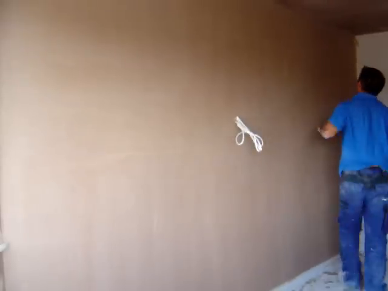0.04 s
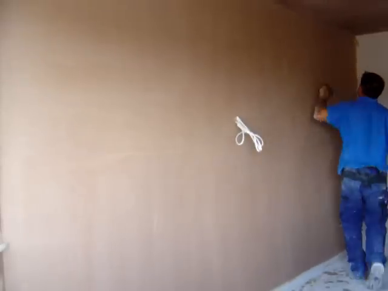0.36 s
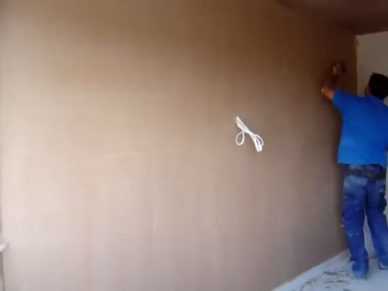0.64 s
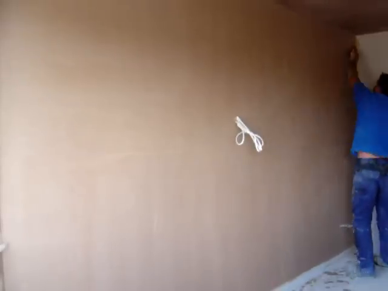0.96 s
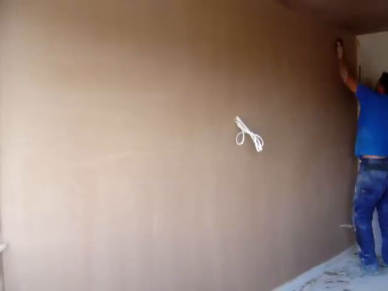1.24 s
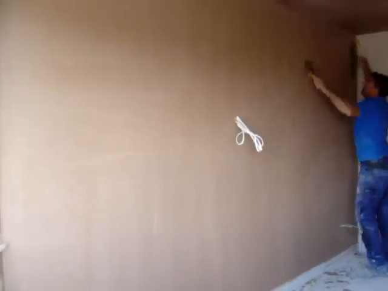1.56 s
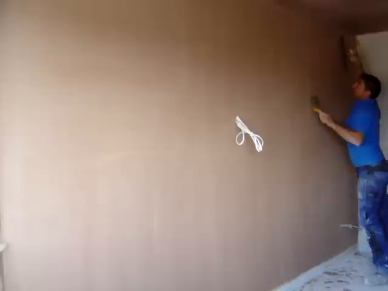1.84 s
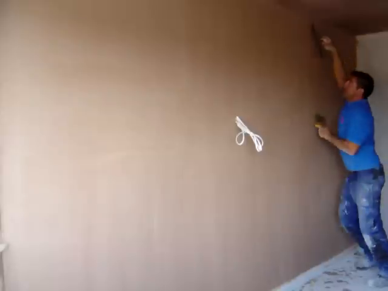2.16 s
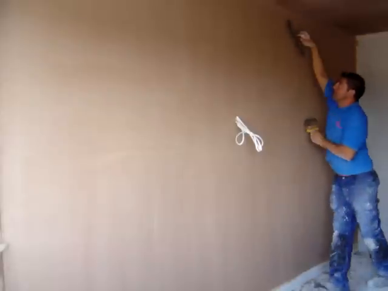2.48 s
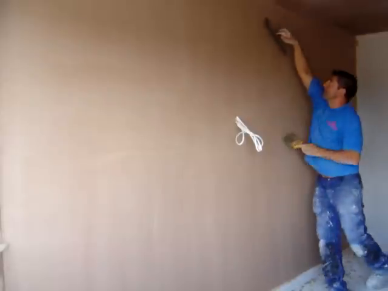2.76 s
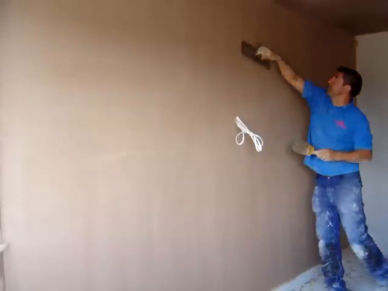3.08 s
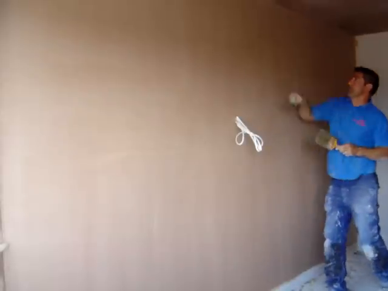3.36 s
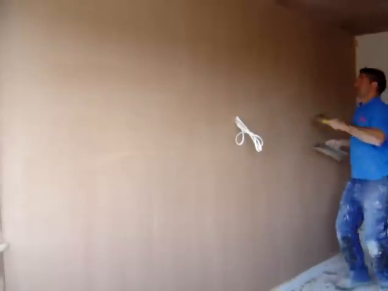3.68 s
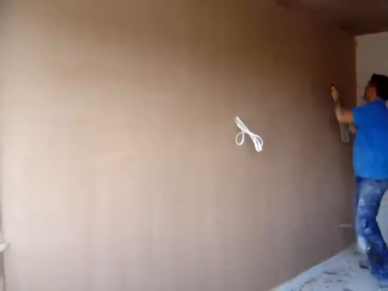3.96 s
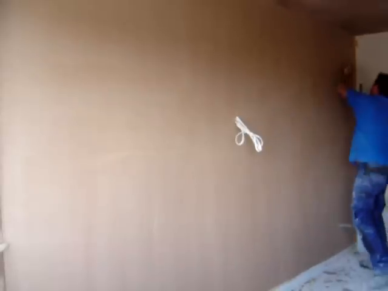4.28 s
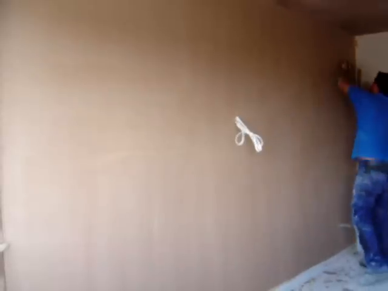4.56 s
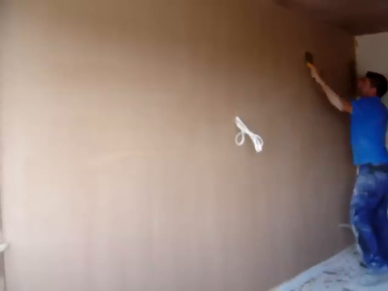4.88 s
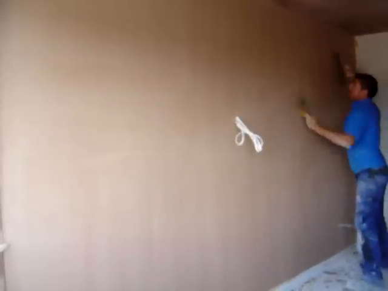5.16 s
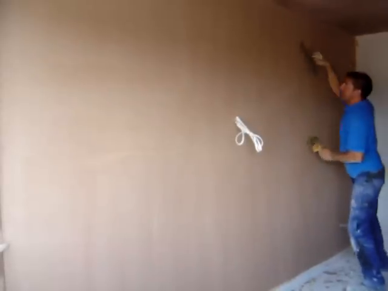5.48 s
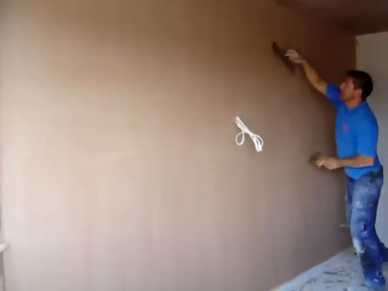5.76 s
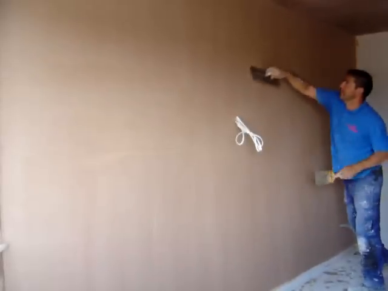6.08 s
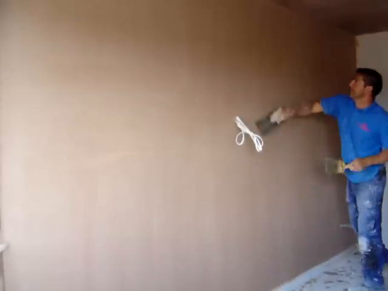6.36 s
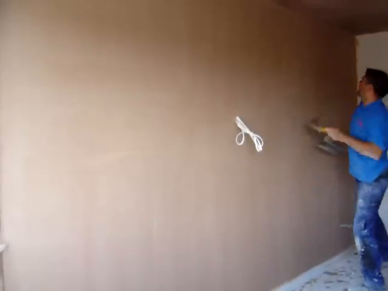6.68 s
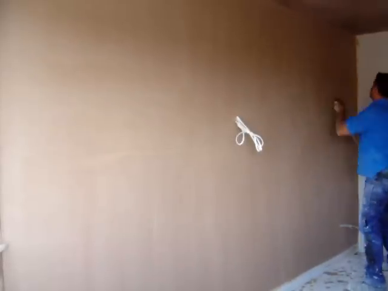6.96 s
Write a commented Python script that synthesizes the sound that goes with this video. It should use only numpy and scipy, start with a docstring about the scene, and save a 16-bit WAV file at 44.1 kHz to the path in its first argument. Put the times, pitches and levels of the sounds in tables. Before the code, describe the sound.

In a bare, echoing room a wet brush slaps a wall and a footstep thuds. A steel trowel catches in the corner, snaps free with a clang and sweeps over wet plaster in a long gritty scrape, then a softer one. Tools tick, the brush swishes, and the judder, clang and scrapes come again. A small microphone inside the room also picks up low steps and a faint hush of air.

```python
"""A steel trowel works wet plaster in a bare room, heard from a small microphone standing inside.
Twice the blade judders into the corner, snaps free with a clang and sweeps on in a long gritty scrape
as sand slips under its edge. In the plasterer's other hand a water brush slaps and swishes.
Behind the work, tools tick and his steps thud on the floor over a faint hush of air.
The hard walls ring for about half a second."""
import sys
import numpy as np
from scipy import signal
from scipy.fft import rfft, irfft
from scipy.io import wavfile
from scipy.ndimage import uniform_filter1d

SR = 44100
rng = np.random.default_rng(int(sys.argv[2]) if len(sys.argv) > 2 else 0)


def output_pcm(signal):
    """Save a mono or channel-first signal as 16-bit PCM at the path in sys.argv[1].

    Samples are clipped to [-1, 1] before scaling.
    """
    pcm = np.clip(np.atleast_2d(signal).T, -1, 1) * 32767
    wavfile.write(sys.argv[1], SR, np.round(pcm).astype(np.int16))


N = 318843
T = np.arange(N) / SR

# Levels in the tables are relative; each source sets its own gain.
# reverberation of the bare room: f/Hz, t60/s
ROOM_DECAY = [(100, 0.55), (500, 0.62), (1400, 0.6), (4000, 0.56), (9000, 0.48)]
# still air around the microphone: f/Hz, level/dB
AIR_SPECTRUM = [(30, -16), (100, -6), (250, 2.5), (550, 3.5), (1200, 1.5), (2500, -5.5), (5000, -7),
                (10000, -13)]

# boom of floor and room: f/Hz, width/Hz, level/dB
FLOOR_MODES = [(106.4, 4.8, 1.5), (132.3, 8.6, 7), (151.6, 70, 9), (179.6, 8, 5), (237.6, 13, -15.5)]
# knock of a heel: f/Hz, level/dB
HEEL_SPECTRUM = [(60, -9.5), (130, -4), (240, -0.5), (340, -3), (480, -15), (900, -22), (3000, -35)]
# steps on the floor, plus a low thump at 1.48 s: t/s, level/dB, knock offset/dB
THUMPS = [(0.136, -22, -21), (0.319, -38, 5.5), (0.38, -43, 4), (0.742, -10.5, -40), (1.482, -37, -5.5),
          (1.881, -35, -29), (2.008, -37.5, 6.5), (2.179, -29.5, -24), (2.538, -27.5, -10.5),
          (2.718, -30.5, -14), (3.015, -29, 4), (3.473, -36.5, 4.5), (4.009, -13, -18), (4.28, -29, 2),
          (5.252, -27.5, -1.5), (5.447, -26, -33), (5.699, -26.5, -10), (6.83, -8.5, -24),
          (7.043, -27.5, -23)]

# small taps of the tools: t/s, tick/dB, clink/dB
TOOL_TAPS = [(2.541, -31, -27), (3.364, -29, -64), (3.669, -40, -31), (3.794, -57, -39), (3.906, -44, -36),
             (6.584, -35.5, -42)]
# light clink of steel: f/Hz, width/Hz, level/dB
CLINK_MODES = [(1367, 16, -6), (2000, 99, -1.5), (3010, 40, -11), (4560, 60, -10)]

# the brush's soft body, its bristle tips and its wet swish: f/Hz, level/dB
BODY_SPECTRUM = [(90, -10), (230, -7), (350, -2), (440, -8.5), (540, 2), (750, -3.5), (1000, -8),
                 (1250, -6), (1500, -9), (2100, -9), (4000, -17), (9000, -52.5)]
TIPS_SPECTRUM = [(500, -27), (2000, -3.5), (2900, -4), (4000, -2), (5500, -2), (8000, -3), (10000, -8)]
SWISH_SPECTRUM = [(200, -28), (900, -6), (1600, -3.5), (2050, 0), (2600, -1.5), (3300, -4.5), (4500, -5.5),
                  (6500, -10), (10000, -18)]
# light passes of the brush: t/s, length/s, body/dB, tips/dB
BRUSH_PASSES = [(0, 0.042, -46.5, -47), (0.416, 0.049, -39.5, -51.5), (1.126, 0.074, -40, -54),
                (1.256, 0.53, -54, -38.5), (3.84, 0.19, -42.5, -61), (4.305, 0.26, -34, -42.5),
                (6.927, 0.27, -47, -51.5)]
# slaps and quick strokes of the brush: t/s, length/s, level/dB, body offset/dB
BRUSH_SLAPS = [(0.126, 0.091, -25.5, -14), (0.374, 0.015, -45, 12.5), (0.747, 0.016, -20, 4),
               (2.541, 0.042, -32, -3), (3.02, .021, -38.5, 5.5), (3.617, 0.057, -41.5, 0.5),
               (4.003, 0.015, -38, 6), (4.271, 0.017, -36, 4.5), (5.399, 0.032, -33, 0.5),
               (5.68, 0.036, -36, 6), (7.14, .03, -46, 3.5)]

# the blade's lower and upper bending modes, and its higher ring: f/Hz, width/Hz, level/dB
LOWER_MODES = [(601, 33, -11.5), (751, 36, -2), (852.4, 55, 2.5), (1020, 24, -5.5), (1097, 45, -15)]
UPPER_MODES = [(1143, 95, 3.5), (1251, 45, 8.5), (1317, 70, -5.5), (1380, 110, -13)]
RING_MODES = [(1288, 8, 6.5), (1400, 28, 7.5), (1754, 140, 3), (2660, 370, -14), (3350, 34, -11),
              (4220, 290, 0)]
# sand under the edge, and the wall under the juddering blade: f/Hz, level/dB
GRIT_SPECTRUM = [(100, -19), (400, -8), (1000, 0), (1550, -6.5), (2000, -3.5), (2650, 0.5), (3300, -3.5),
                 (4600, -9), (5800, -9), (8000, -14), (10000, -17)]
WALL_SPECTRUM = [(80, -27), (170, -21), (250, -1), (345, 7.5), (440, -4), (560, 7.5), (780, 2.5),
                 (1050, -10), (1600, -17.5), (2600, -27), (9000, -33)]
# trowel pushed up the wall: start/s, fastest/s, end/s, first level/dB, upper offset/dB, grit offset/dB
TROWEL_PUSHES = [(1.812, 1.9, 2.767, -36.5, 3.5, 6.5), (5.003, 5.42, 5.823, -29.5, -3.5, 5.5)]
# trowel pulled back down: start/s, lift-off/s, level/dB, upper offset/dB, grit offset/dB
TROWEL_PULLS = [(2.917, 3.313, -45, -3, 6), (6.006, 6.46, -43.5, 0, 5.5)]
# the edge grabs in mid-sweep and the lower modes sing out: t/s, level/dB
EDGE_GRABS = [(3.10, -31), (5.69, -47)]
# the edge catches in the corner: lands/s, snaps free/s, snap rise/s, wall/dB, wall swell/dB, clang/dB,
# upper offset/dB, grit offset/dB, ring offset/dB
CORNER_CATCHES = [(1.411, 1.477, 0.002, -31.5, -13, -21.5, 7, 8.5, 1.5),
                  (4.668, 4.874, 0.02, -25, 7, -14, -2, -3, -3)]


def undb(db):
    """Decibels to gain."""
    return 10 ** (np.asarray(db) / 20)


def unit(x):
    """Scale to rms 1."""
    return x / np.sqrt(np.mean(x ** 2))


def through(x, response):
    """Pass x through a response scaled to unit energy."""
    return signal.fftconvolve(x, response / np.linalg.norm(response))[:N]


def colour(x, spectrum, size=4096):
    """Causal filter shaped like the spectrum (f/Hz, level/dB)."""
    hz, db = np.transpose(spectrum)
    bins_hz = np.maximum(np.fft.rfftfreq(size, 1 / SR), 1)
    outline = np.interp(np.log(bins_hz), np.log(hz), db)
    cepstrum = irfft(np.log(undb(outline)))
    cepstrum[1:size // 2] *= 2  # fold to minimum phase
    cepstrum[size // 2 + 1:] = 0
    return through(x, irfft(np.exp(rfft(cepstrum))))


def resonate(x, modes):
    """Ring the modes; level sets each one's share of the energy, and neighbours swing opposite ways."""
    t = T[:SR // 2]
    response = 0
    for k, (hz, width, db) in enumerate(modes):
        decay = undb(db) * np.sqrt(width) * np.exp(-np.pi * width * t)
        response += (-1) ** k * decay * np.cos(2 * np.pi * hz * t)
    return through(x, response)


def wander(per_s):
    """Smooth random drift of rms 1."""
    span = max(int(SR / per_s), 2)
    held = np.repeat(rng.standard_normal(N // span + 1), span)
    return unit(uniform_filter1d(held, span)[:N])


def grains(per_s, spread_db):
    """Tiny slips and breaking grains of uneven size."""
    size = rng.standard_normal(N) * undb(spread_db * np.clip(rng.standard_normal(N), -2, 2))
    return unit(size * (rng.random(N) < per_s / SR))


def contact(start, rise_s, hold_s, release_s):
    """Force of one touch: it builds, holds and lets go."""
    build = np.clip((T - start) / rise_s, 0, 1)
    return build * np.exp(-np.clip((T - start - rise_s - hold_s) / release_s, 0, 20))


def glide(start, end, on_s=0.04, off_s=0.04):
    """Gain of a tool that glides onto the wall before start and off it after end."""
    return np.clip(1 + np.minimum((T - start) / on_s, (end - T) / off_s), 0, 1)


def accent(start, db, decay_s):
    """Extra gain at the first instant of a touch."""
    return undb(db * np.exp(-np.maximum(T - start, 0) / decay_s))


def still_air(level_db=-50):
    """The room's faint steady hush."""
    return undb(level_db) * colour(rng.standard_normal(N), AIR_SPECTRUM)


def wall_echoes(build_s=0.00033):
    """Dense echoes from bare walls; the treble dies a little sooner."""
    hz, _, bands = signal.stft(rng.standard_normal(SR), SR, nperseg=256)
    t60 = np.interp(hz, *np.transpose(ROOM_DECAY))
    age = np.linspace(0, 1, bands.shape[1])
    decay = np.exp(-np.log(1000) * age / t60[:, None])
    tail = signal.istft(bands * decay)[1][:SR]
    return tail * (1 - np.exp(-T[:SR] / build_s))


def room(x, direct_db=-3, echo_db=-4, null_hz=300, patterns=8, patterns_per_s=45):
    """The path to the microphone: the hand keeps moving, so one echo pattern fades into the next."""
    place = patterns_per_s * T
    echoes = 0
    for k in range(patterns):
        distance = np.abs((place - k) % patterns - patterns / 2)
        share = np.cos(np.pi / 2 * np.minimum(distance, 1))
        echoes += through(x * share, wall_echoes())
    # reflections cancel at one low pitch where the microphone stands
    null = signal.iirnotch(null_hz, Q=5, fs=SR)
    return signal.lfilter(*null, undb(direct_db) * x + undb(echo_db) * echoes)


def steps_and_thump(push_s=0.0012, lag_s=0.0025, second_s=0.05, second_db=-11.5):
    """Steps, and a low thump at 1.48 s: each booms and knocks twice, the second softer."""
    push = scuff = 0
    for start, first_db, knock_db in THUMPS:
        for lands, db in [(start, first_db), (start + second_s, first_db + second_db)]:
            push += undb(db) * np.exp(-np.minimum(((T - lands - lag_s) / push_s) ** 2, 20))
            scuff += undb(db + knock_db) * contact(lands, rise_s=0.0028, hold_s=0.0025, release_s=0.019)
    boom = undb(-17.5) * resonate(push, FLOOR_MODES)
    knock = undb(3) * colour(scuff * rng.standard_normal(N), HEEL_SPECTRUM)
    return boom, knock


def tool_taps():
    """Light ticks of the tools; some make the steel clink."""
    tick, clink = sum(undb(levels)[:, None] * contact(t, rise_s=0.0046, hold_s=0.00078, release_s=0.0081)
                      for t, *levels in TOOL_TAPS)
    ticks = colour(tick * rng.standard_normal(N), TIPS_SPECTRUM)
    return ticks + resonate(clink * rng.standard_normal(N), CLINK_MODES)


def brush_passes(fade_s=0.17):
    """Wet bristles flick and hiss as they are drawn lightly over the wall."""
    body, tips = sum(undb(levels)[:, None] * glide(start, start + length, fade_s, fade_s)
                     for start, length, *levels in BRUSH_PASSES)
    flicks = grains(per_s=6000, spread_db=5) * undb(1.9 * wander(per_s=35))
    hiss = grains(per_s=9000, spread_db=5)
    return undb(-4.5) * colour(flicks * body, BODY_SPECTRUM) + undb(-2) * colour(hiss * tips, TIPS_SPECTRUM)


def brush_slaps():
    """The loaded brush lands: a soft slap under a spitting swish; longer strokes swell more slowly."""
    force = body = 0
    for start, length, db, body_db in BRUSH_SLAPS:
        touch = contact(start, rise_s=0.0016 + 0.2 * length, hold_s=length, release_s=0.021)
        force += undb(db) * touch
        body += undb(db + body_db) * touch
    swish = colour(force * grains(per_s=4600, spread_db=0), SWISH_SPECTRUM)
    slap = colour(body * grains(per_s=5000, spread_db=5.5), BODY_SPECTRUM)
    return swish + slap


def push_drive(start, fastest, end, db, upper_db, grit_db, slacken_db=-9, tilt_db=-6.5, speed_db=12.5):
    """Drive of (lower, upper, grit): pressure slackens as the arm stretches; hiss follows the speed."""
    reach = np.interp(T, [start, end], [0, 1])
    speed = np.sin(np.interp(T, [start, fastest, end], [0, np.pi / 2, np.pi]))
    level = db + slacken_db * reach ** 1.35  # holds at first, gives way near full reach
    upper = level + upper_db + tilt_db * reach
    grit = level + grit_db + speed_db * (speed - 1)
    return glide(start, end) * undb([level, upper, grit])


def pull_drive(start, end, db, upper_db, grit_db, flick_db=5.5, flick_s=0.077, tilt_db=-0.5):
    """Drive of (lower, upper, grit): a slow start, even pressure, then a flick as the blade lifts off."""
    flick = np.exp(-((T - end) / flick_s) ** 2)
    level = db + flick_db * flick
    upper = level + upper_db + tilt_db * flick
    return glide(start, end, on_s=0.2) * undb([level, upper, level + grit_db])


def catch_drive(lands, snaps, rise_s, wall_db, swell_db, clang_db, upper_db, grit_db, ring_db,
                strain_db=-9, strain_db_per_s=108):
    """Drive of (lower, upper, wall, grit, ring): a bump, growing strain while stuck, then the snap."""
    stuck = contact(lands, rise_s=0.0045, hold_s=snaps - lands, release_s=0.0031)
    progress = np.interp(T, [lands, snaps], [0, 1])
    wall = stuck * accent(lands, db=10.5, decay_s=0.023) * undb(wall_db + swell_db * progress)
    strain = stuck * undb(clang_db + strain_db - strain_db_per_s * np.maximum(snaps - T, 0))
    snap = undb(clang_db) * accent(snaps, db=12, decay_s=0.004)
    clang = snap * contact(snaps, rise_s, hold_s=0.011, release_s=0.032)
    crack = snap * contact(snaps, rise_s, hold_s=0.011, release_s=0.015)  # grit stops before the blade
    blade = np.maximum(strain, clang)
    grit = undb(grit_db) * (undb(-44) * stuck + crack)
    ring = undb(ring_db) * np.maximum(undb(1.5) * strain, clang)
    return np.array([blade, undb(upper_db) * blade, wall, grit, ring])


def trowel_sweeps(flex_s=0.001275):
    """Along the wall the edge drags over sand: uneven slips ring the blade while the grit hisses."""
    pushes = sum(push_drive(*row) for row in TROWEL_PUSHES)
    pulls = sum(pull_drive(*row) for row in TROWEL_PULLS)
    lower, upper, grit = pushes + pulls
    lower += sum(undb(db) * contact(t, rise_s=0.015, hold_s=0.01, release_s=0.014) for t, db in EDGE_GRABS)
    drag = undb(wander(per_s=60))
    slips = grains(per_s=4200, spread_db=1) * drag
    sand = grains(per_s=9000, spread_db=3) * drag
    blade = resonate(slips * lower, LOWER_MODES) + resonate(slips * upper, UPPER_MODES)
    # the blade flexes under the hand, so its pitch wavers
    blade = np.interp(T + flex_s * wander(per_s=9), T, blade)
    return blade + colour(sand * grit, GRIT_SPECTRUM)


def trowel_catches(damping=3.1):
    """In the corner the blade sticks and judders against the wall, then snaps free and clangs."""
    lower, upper, wall, grit, ring = sum(catch_drive(*row) for row in CORNER_CATCHES)
    judder = unit(undb(2.2 * wander(per_s=300)))
    slips = grains(per_s=8000, spread_db=1.5) * judder
    sand = grains(per_s=14000, spread_db=1.5) * judder
    pressed = np.array([1, damping, 1])  # flat on wet plaster, the bending modes widen and ring shorter
    steel = resonate(slips * lower, pressed * LOWER_MODES) + resonate(slips * upper, pressed * UPPER_MODES)
    steel += resonate(sand * ring, RING_MODES)
    return steel + colour(slips * wall, WALL_SPECTRUM) + colour(sand * grit, GRIT_SPECTRUM)


def scene():
    """Tools, feet and air as they reach the microphone, in mono."""
    boom, knock = steps_and_thump()
    work = trowel_sweeps() + trowel_catches() + brush_passes() + brush_slaps() + tool_taps()
    air = still_air()
    return (room(work + knock) + boom + air)[None]


def record(dry, low_cut_hz=70, top_hz=10100, ceiling=0.68):
    """Thin deep bass, the loudest peaks clipped, treble cut above about 10 kHz."""
    thin = signal.sosfilt(signal.butter(2, low_cut_hz, "high", fs=SR, output="sos"), dry)
    clipped = np.clip(thin + 0.08 * thin ** 2, -ceiling, ceiling)
    return signal.sosfilt(signal.ellip(12, 0.2, 80, top_hz, fs=SR, output="sos"), clipped)


dry = scene()
out = record(dry)
output_pcm(out)
```